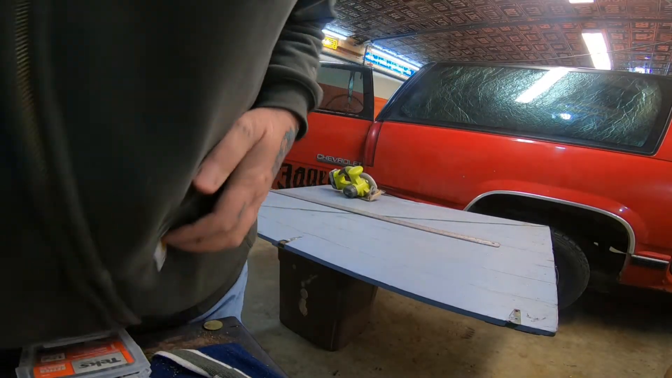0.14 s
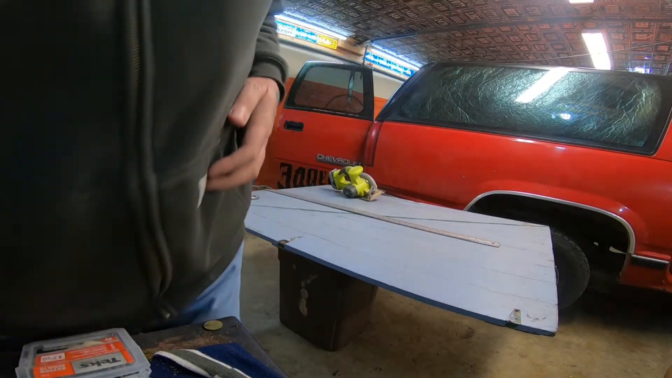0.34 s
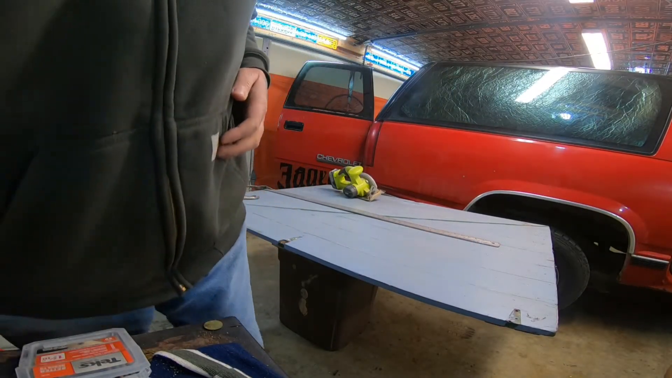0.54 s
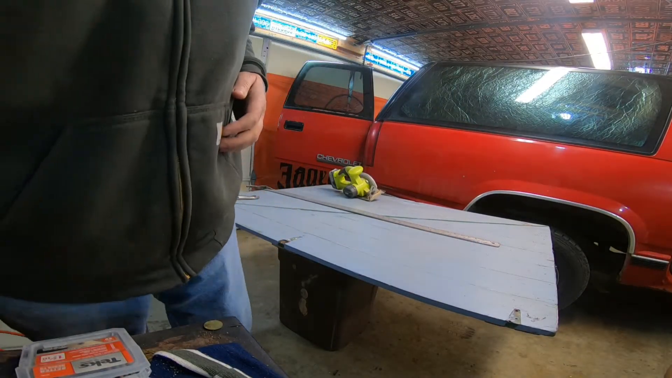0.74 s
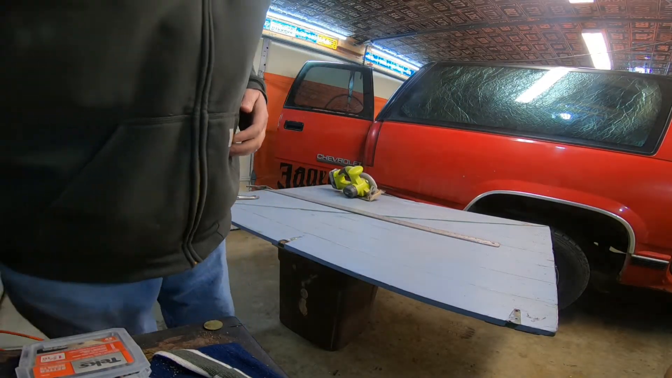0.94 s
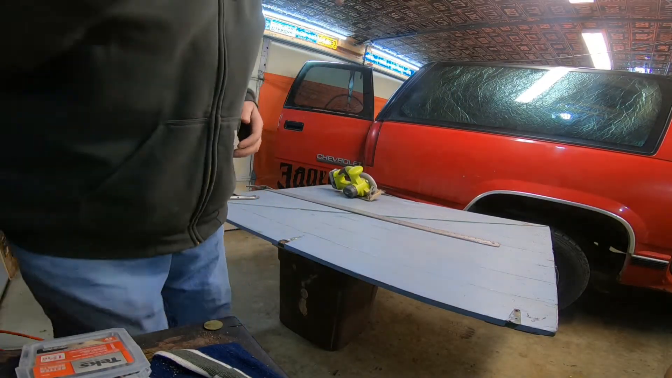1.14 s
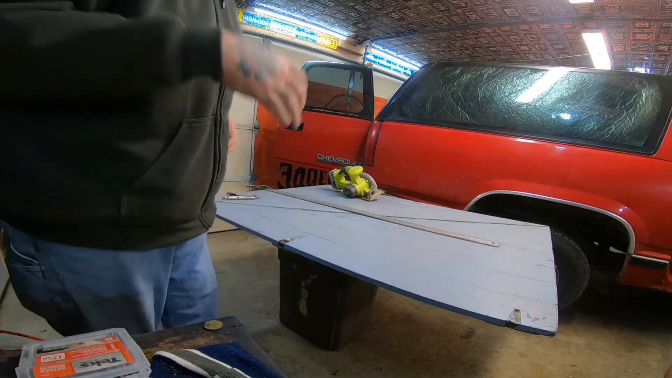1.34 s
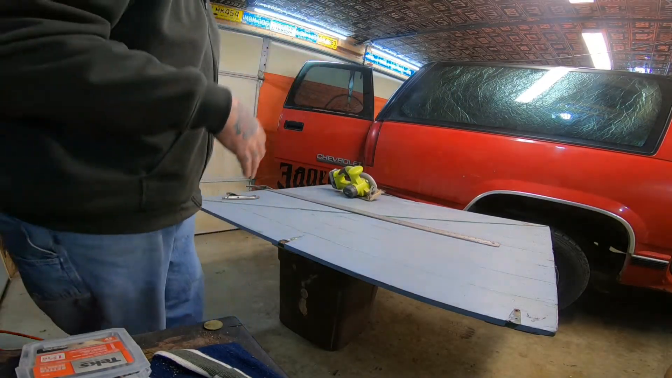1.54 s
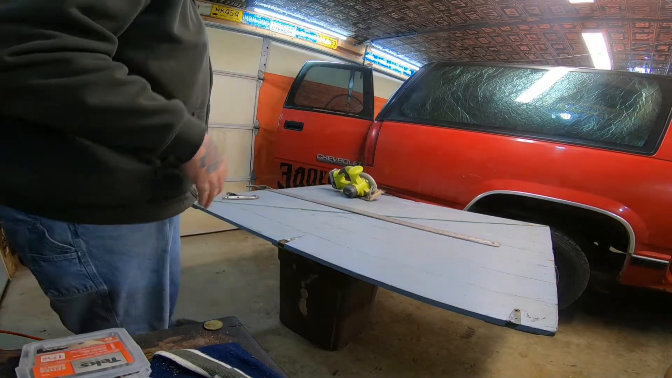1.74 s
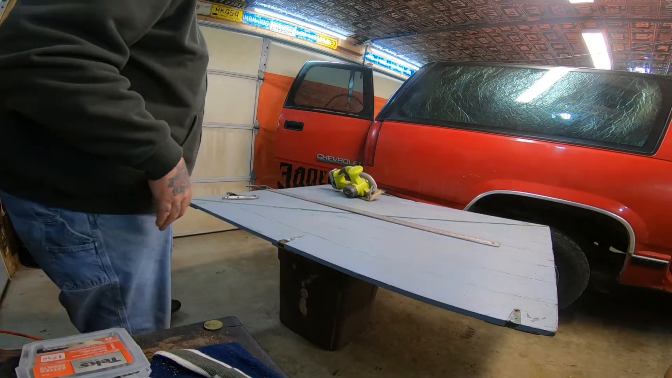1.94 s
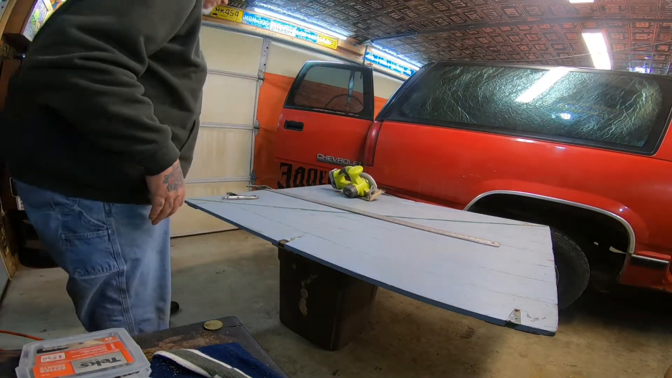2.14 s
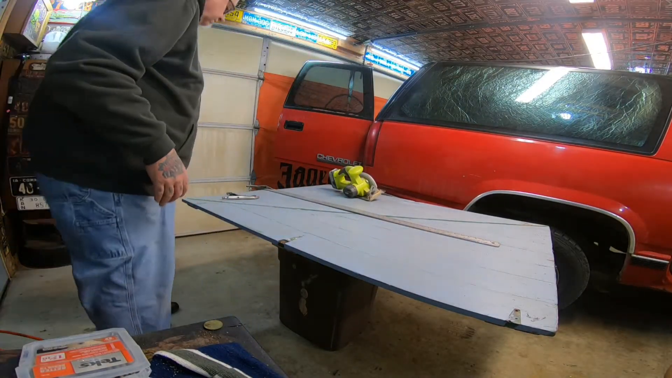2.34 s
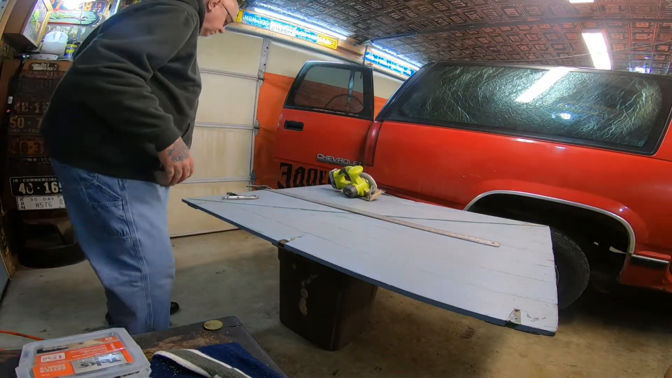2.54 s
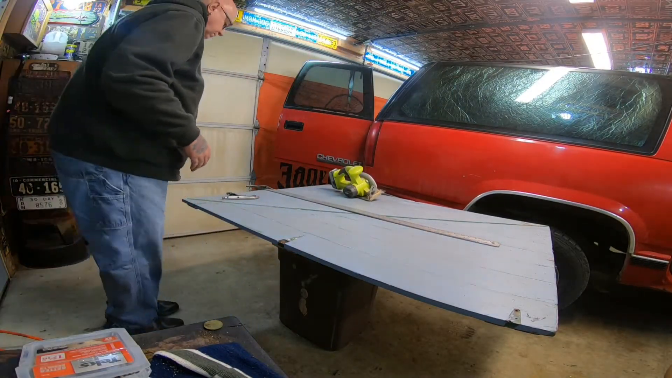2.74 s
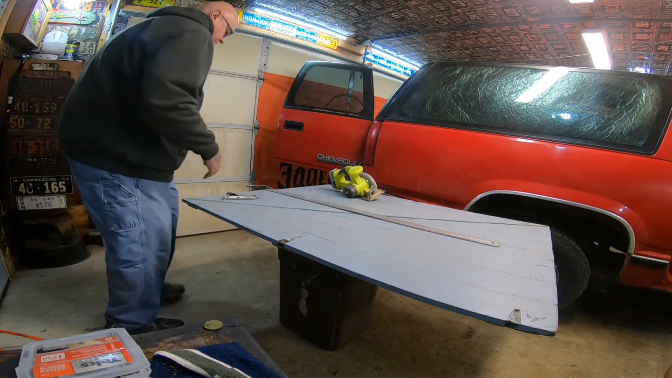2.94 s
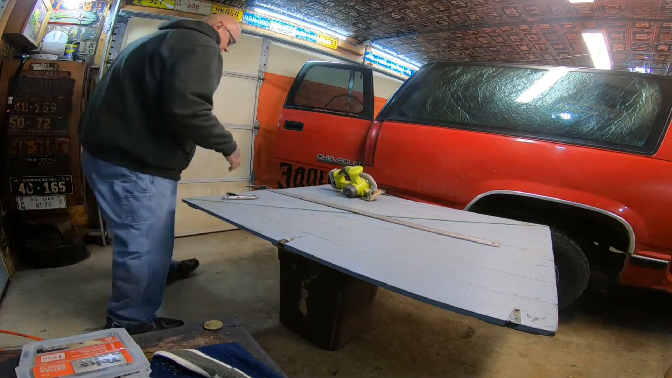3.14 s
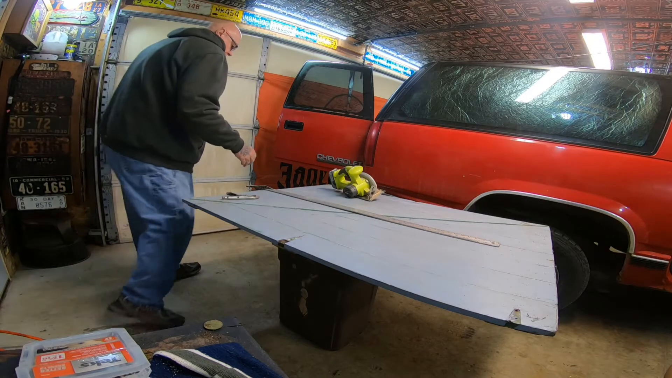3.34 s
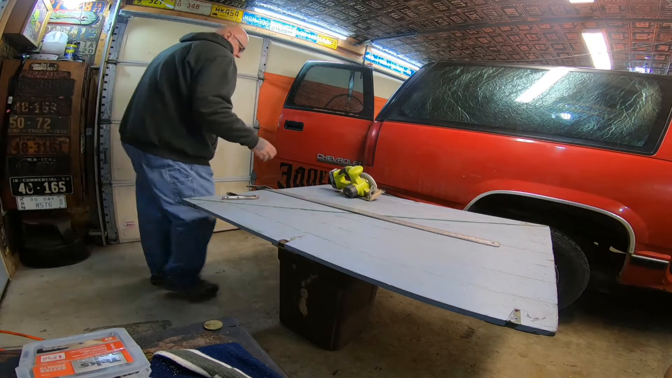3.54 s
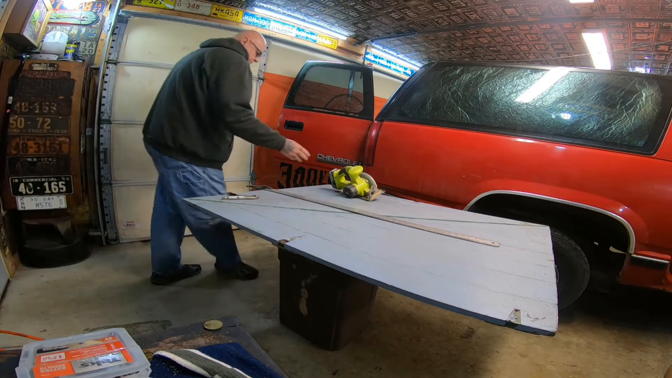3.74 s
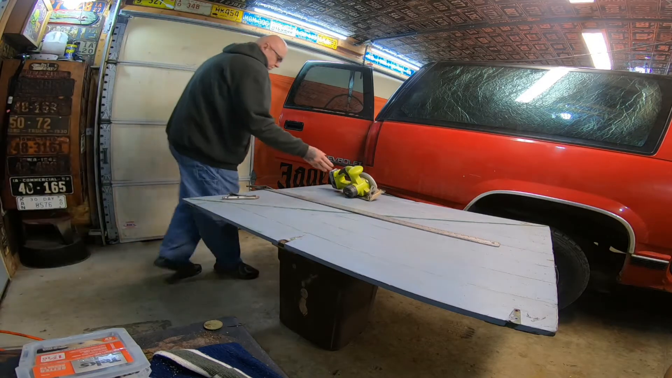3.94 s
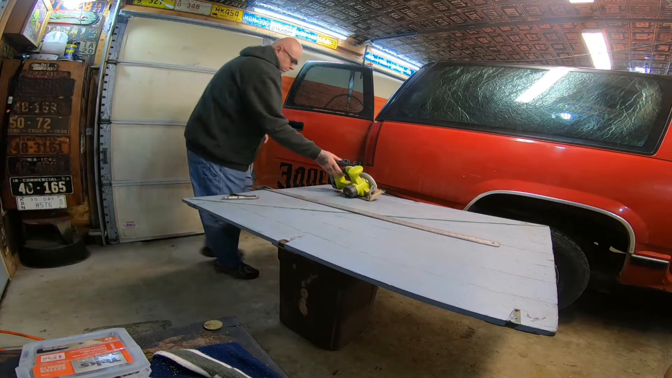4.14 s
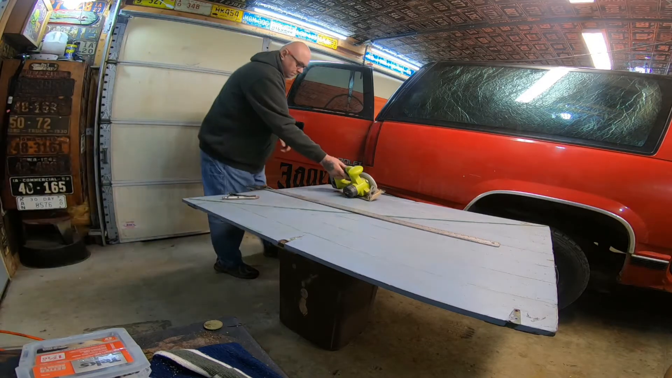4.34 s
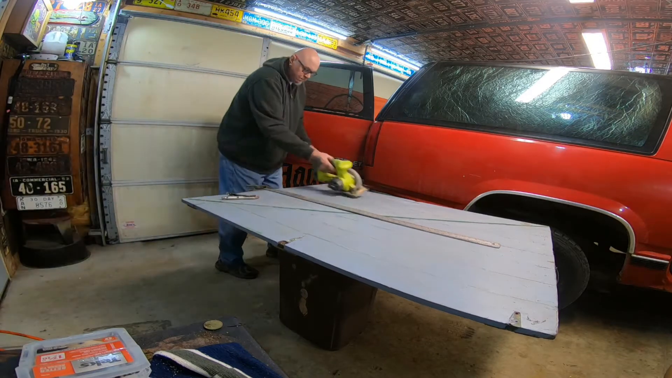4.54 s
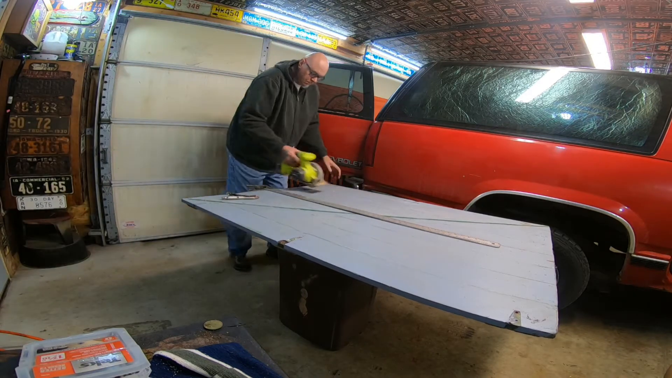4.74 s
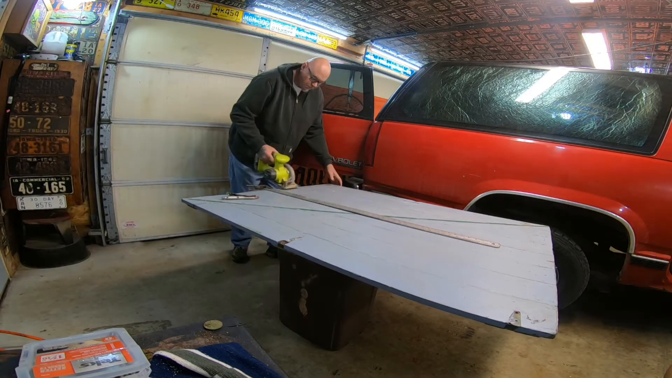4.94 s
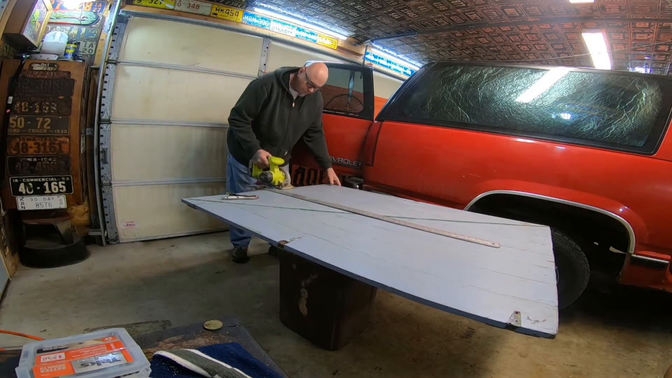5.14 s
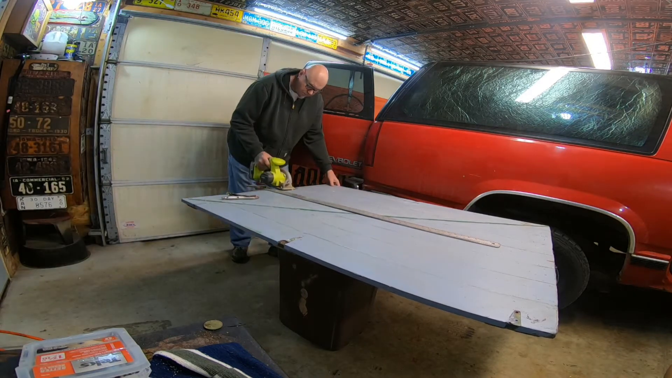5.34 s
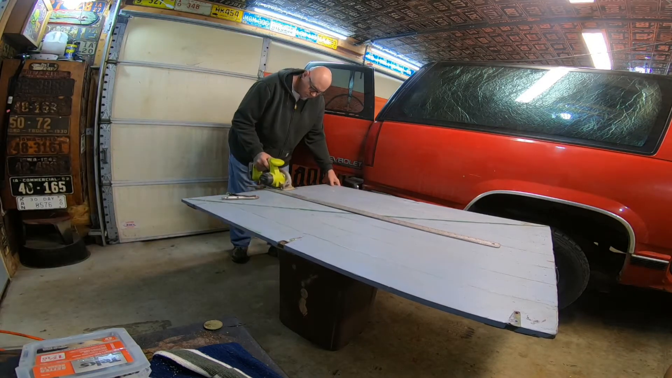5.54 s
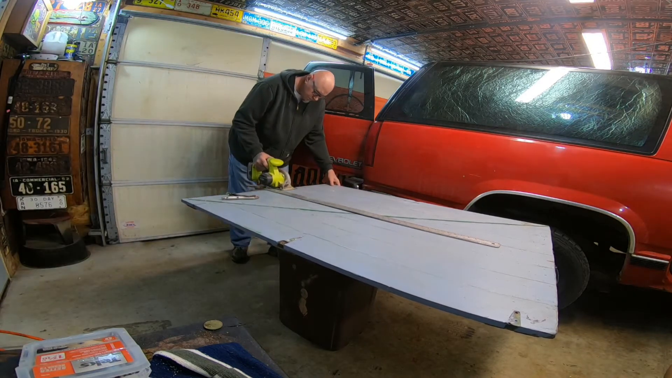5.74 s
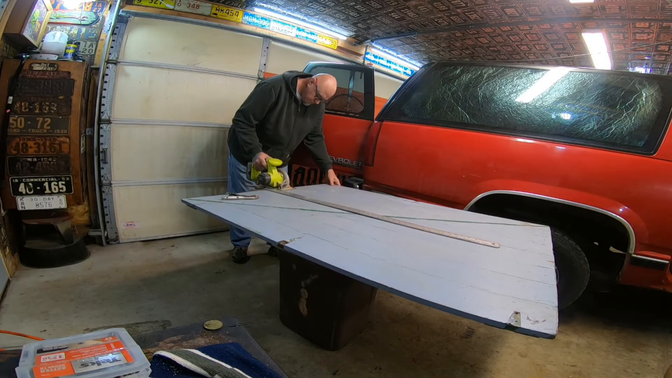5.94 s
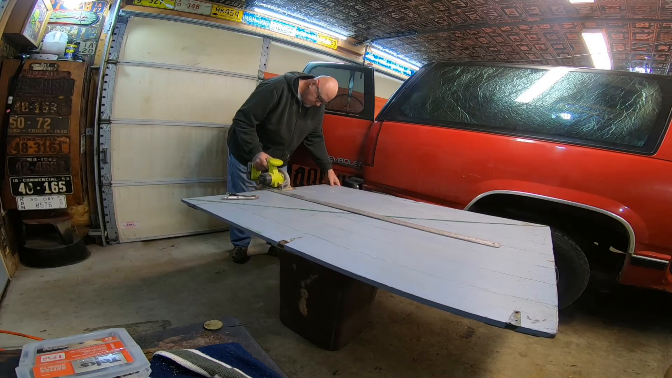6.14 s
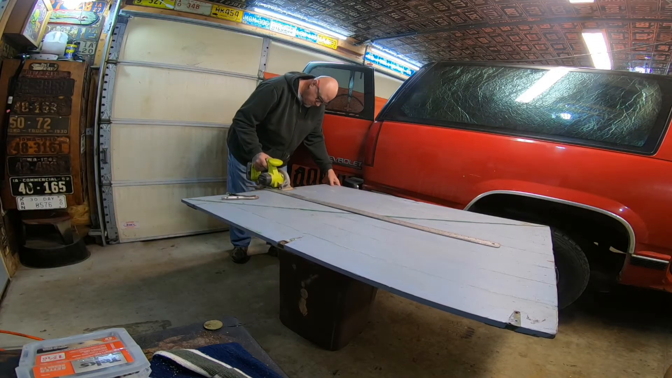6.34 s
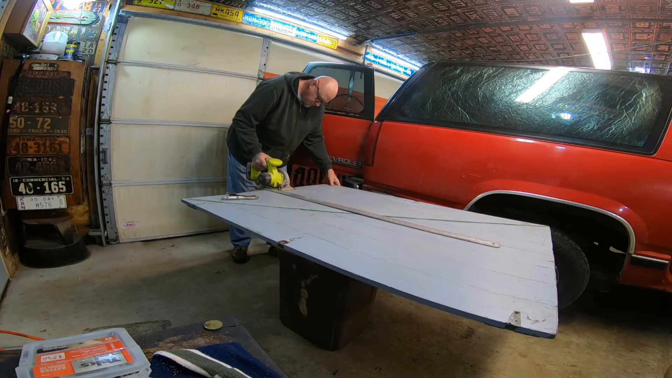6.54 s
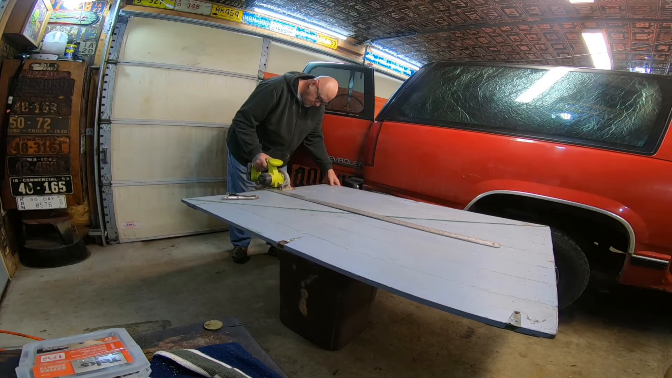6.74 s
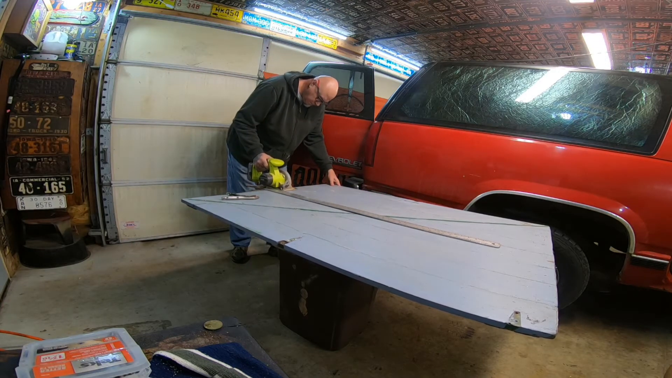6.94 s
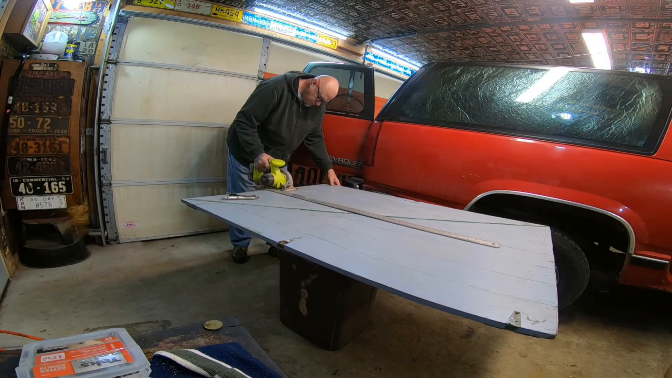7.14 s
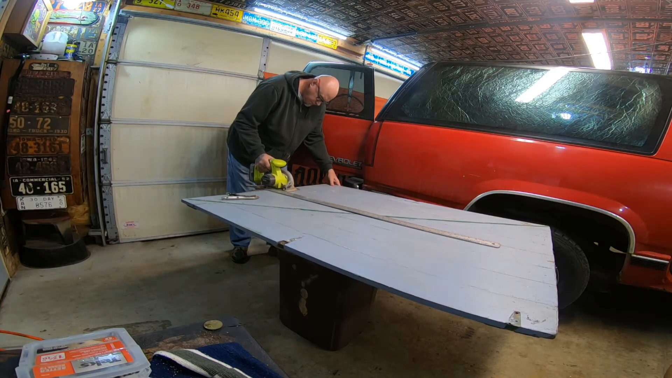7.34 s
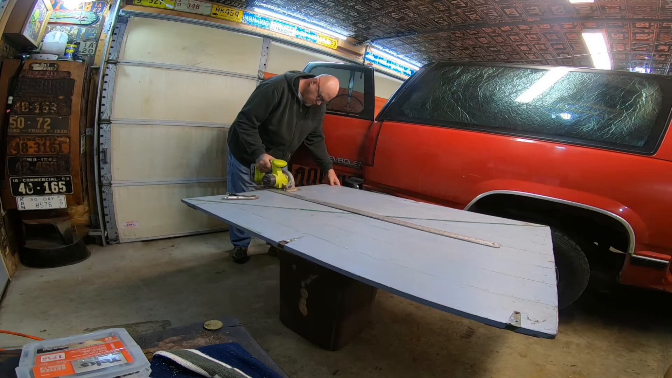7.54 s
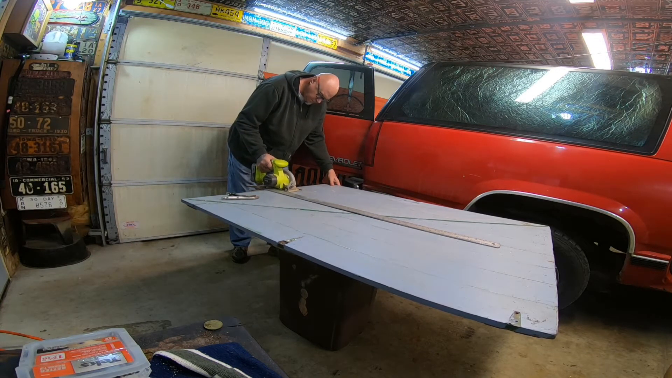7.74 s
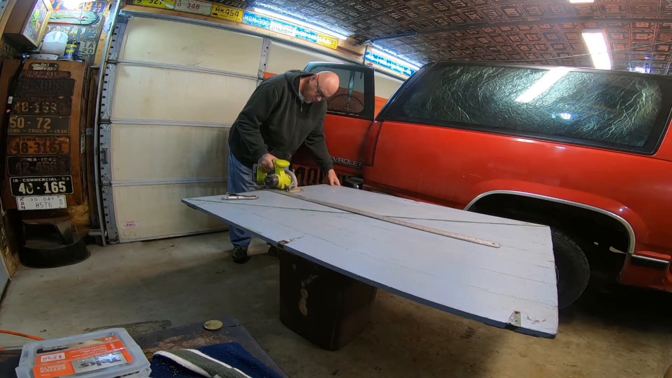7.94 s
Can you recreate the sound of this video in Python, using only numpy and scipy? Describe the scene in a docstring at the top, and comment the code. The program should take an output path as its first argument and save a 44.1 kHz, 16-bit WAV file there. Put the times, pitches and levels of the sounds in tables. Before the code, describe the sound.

Jacket rustle and scuffing shoes recede from the microphone, a power saw knocks onto a board, then it whirs up and cuts loudly.

```python
"""A circular saw cuts a large board in a garage: its teeth chop the wood and ring the blade,
which slows as it bites deeper, over the rush of the motor. Before the cut, a man walks off from the
microphone, jacket rustling close by and shoes scuffing on concrete, then drags the saw over the board
and knocks it into place. Shaped noise makes the rubs, tearing and rush; damped modes make the board;
sines make the hum and whine. Two microphone ports hear it over soft hum, room noise and hiss."""
import sys
import numpy as np
from scipy import signal
from scipy.fft import rfft, irfft, next_fast_len
from scipy.io import wavfile
from scipy.ndimage import map_coordinates

SR = 44100
rng = np.random.default_rng(int(sys.argv[2]) if len(sys.argv) > 2 else 0)


def digitize_waveform(pressure):
    """Quantize a signal to 16-bit integers and store it at the path in sys.argv[1].

    Rows of a 2-D input are taken as channels; values are limited to [-1, 1].
    """
    field = np.atleast_2d(pressure).T
    bounded = np.clip(field, -1, 1)
    quanta = np.round(bounded * 32767).astype(np.int16)
    wavfile.write(sys.argv[1], SR, quanta)


N = 356769  # length in samples


def amp(db):
    """Decibels to gain."""
    return 10 ** (np.asarray(db) / 20)


def unit(x):
    """Scale to rms 1."""
    return x / np.sqrt(np.mean(x ** 2) + 1e-20)


def along(points, hz):
    """Read (f/Hz, value) points on a log frequency axis."""
    f, v = np.transpose(points)
    return np.interp(np.log(hz + 1), np.log(f + 1), v)


def curves(rows):
    """One value per sample for each column after the time."""
    s, *cols = np.transpose(rows)
    return [np.interp(np.arange(N) / SR, s, c) for c in cols]


def wobble(rate):
    """A smooth random curve, rate knots a second."""
    knots = rng.standard_normal(int(N * rate / SR) + 4)
    return map_coordinates(knots, [np.arange(N) * rate / SR])


def filtered(x, response):
    """x times a response of frequency."""
    n = x.shape[-1]
    m = next_fast_len(n + 8192)
    return irfft(rfft(x, m) * response(np.fft.rfftfreq(m, 1 / SR)), m)[..., :n]


def colour(x, spectrum):
    """Give x a spectrum, at rms 1."""
    return unit(filtered(x, lambda hz: amp(along(spectrum, hz))))


def resonate(x, modes):
    """Ring x through (f/Hz, width/Hz, level/dB) resonances, at rms 1."""
    def response(f):
        return sum(amp(db) * 1j * f * w / (c * c - f * f + 1j * f * w) for c, w, db in modes)
    return unit(filtered(x, response))


# likeness of left and right at the microphone: (f/Hz, coherence)
COHERENCE = [(120, 0.94), (190, 0.85), (260, 0.82), (400, 0.91), (650, 0.53), (1500, 0.38), (3500, 0.88),
             (5000, 0.64), (7000, 0.086), (14000, 0.017)]


def diffuse(size):
    """White stereo noise, alike in the bass and unrelated in the top treble."""
    def mid_side(hz):
        turn = np.arccos(np.clip(along(COHERENCE, hz), -1, 1)) / 2
        return np.array([np.cos(turn), np.sin(turn)])
    mid, side = filtered(rng.standard_normal((2, size)), mid_side)
    return np.array([mid + side, mid - side])


def pan(db):
    """Left and right gains for a level difference, left minus right."""
    return amp(np.array([np.atleast_1d(db), -np.atleast_1d(db)]) / 2)


def add(track, s, sound):
    """Mix a sound into the track at a time."""
    part = track[:, round(s * SR):][:, :sound.shape[-1]]
    part += sound[:, :part.shape[-1]]


# decay of the garage: (f/Hz, t60/s)
GARAGE_DECAY = [(100, 0.21), (300, 0.85), (800, 0.45), (2000, 0.28), (5000, 0.43), (12000, 0.35)]


def garage(x, wet_db):
    """The direct sound plus a dense tail from walls and car, at constant power."""
    hz, t, z = signal.stft(diffuse(size=SR * 3 // 4), SR, nperseg=256)
    decay = amp(-60 * t / along(GARAGE_DECAY, hz)[:, None])
    tail = signal.istft(z * decay, SR, nperseg=256)[1]
    tail *= amp(wet_db) / np.linalg.norm(tail[0])
    tail[:, 0] += 1  # the direct sound
    wet = signal.fftconvolve(np.atleast_2d(x), tail, axes=1)[:, :x.shape[-1]]
    return wet / np.hypot(1, amp(wet_db))


def stroke(start, length, db, attack, release):
    """The gain of one rubbing move: it rises, holds, then falls 60 dB over the release."""
    t = np.arange(N) / SR - start
    fall_db = 60 * np.clip((t - length) / release, 0, 2)
    return np.clip(t / attack, 0, 1) * amp(db - fall_db)


def together(gains):
    """Overlapping strokes add in power."""
    return np.sqrt(sum(gain ** 2 for gain in gains))


# slow fading of the hum: (t/s, mean level/dB)
HUM_LEVEL = [(0, -56), (.8, -54.5), (1.3, -60), (4.3, -59.5), (5.8, -68.5)]
# spectrum of the room noise: (f/Hz, level/dB per Hz)
ROOM_SPECTRUM = [(15, -26.5), (60, -2.5), (110, -15), (165, -1.5), (300, -4), (380, -12), (480, -23),
                 (680, -11.5), (900, -20), (1500, -22.5), (2200, -31), (5000, -32), (15000, -64)]
# spectrum of the microphone hiss: (f/Hz, level/dB per Hz)
HISS_SPECTRUM = [(2000, -30.5), (4500, -16), (5600, -5.5), (6150, 1), (6700, -14), (7300, -14.5),
                 (8700, -0.5), (10300, -7.5), (11200, -15.5), (11900, -4.5), (13200, -14), (14200, -17),
                 (15000, -36)]


def background():
    """Something hums softly, a sine of unsteady phase, over dim room noise and microphone hiss."""
    hum_hz = 200
    phase = 2 * np.pi * hum_hz * np.arange(N) / SR + 0.46 * wobble(25)
    hum = amp(curves(HUM_LEVEL)[0] + 2.5 * wobble(9)) * unit(np.sin(phase))
    room = amp(-59.0) * colour(diffuse(size=N), ROOM_SPECTRUM)
    hiss = amp(-64.5) * colour(diffuse(size=N), HISS_SPECTRUM) * pan(-11.0)
    return hum + room + hiss


# the jacket rubs with each move of arm or leg: (start t/s, length t/s, mean level/dB)
JACKET_MOVES = [(-.05, 0.26, -48.5), (.22, .29, -51.5), (.5, 0.16, -59), (.82, 0.15, -58),
                (.92, 0.54, -56.5), (1.47, 0.11, -58.5), (2.3, 0.17, -60.5), (2.78, 0.16, -59),
                (3.16, 0.24, -59), (3.87, 0.18, -59), (4.2, 0.22, -61)]
# a hand slides in the pocket: (start t/s, length t/s, level/dB)
POCKET_MOVES = [(.95, 0.21, -59.5)]
# spectrum of the rubbing cloth: (f/Hz, level/dB per Hz)
CLOTH_SPECTRUM = [(180, -26), (300, 1.5), (520, -8.5), (900, -9), (1360, -5), (1900, -1.5), (2500, -6),
                  (4300, -5), (5000, -9.5), (6000, -14.5), (7000, -19), (10800, -48), (15000, -62)]
# the zip and pocket tick close by: (t/s, starting level/dB, brightness f/Hz, t60/s)
ZIP_TICKS = [(0.011, -40, 1100, 0.076), (0.415, -42, 1280, 0.12), (0.499, -33.5, 2760, 0.027),
             (0.68, -46.5, 1960, 0.06), (0.953, -49.5, 1200, 0.26)]
CLOTH_ATTACK_S, CLOTH_RELEASE_S = 0.038, 0.38  # rise of a rub, and its time to fall 60 dB
# dull flapping fades as he walks off: mean level at START_M, that distance to the microphone, pace
FOLDS_DB, START_M, PACE_M_PER_S = -51.5, 0.28, 0.57


def jacket():
    """Cloth rubs in small clumps near the microphone, a hand slides in the pocket and the zip ticks."""
    def moves(rows):
        return together(stroke(s, length, db, CLOTH_ATTACK_S, CLOTH_RELEASE_S) for s, length, db in rows)
    cloth = colour(diffuse(size=N) * amp(1.05 * wobble(700)), CLOTH_SPECTRUM)
    rustle = moves(JACKET_MOVES) * amp(1.23 * wobble(40)) * cloth
    pocket = moves(POCKET_MOVES) * resonate(diffuse(size=N), [(1950, 72, 0)])
    nearness = START_M / (START_M + PACE_M_PER_S * np.arange(N) / SR)
    flapping = colour(diffuse(size=N), [(15, -6), (35, 7), (70, -3), (110, -12.5), (170, 2.5),
                                        (380, -4.5), (700, -18.0), (2000, -58)])
    folds = nearness * amp(FOLDS_DB + 5.7 * wobble(12.3)) * flapping
    track = rustle + pocket + folds
    t = np.arange(SR // 8) / SR
    for s, db, bright_hz, t60 in ZIP_TICKS:
        spectrum = [(200, -12), (700, -2), (bright_hz, 0), (2 * bright_hz, -15), (14000, -40)]
        tick = colour(diffuse(size=len(t)), spectrum)
        add(track, s, amp(db) * tick * amp(-60 * t / t60))
    return track


# shoes on concrete, and near 1.28 s a hand pulled out of the pocket:
# (t/s, scuff level/dB before SCUFF_GAIN_DB, rise t/s, scuff t60/s, dull blow level/dB)
SCUFFS = [(1.099, -47, .026, 0.16, -53), (1.275, -45, 0.0085, 0.22, -43), (1.29, -41.5, .023, 0.14, -39),
          (2.159, -65, 0.017, 1, -51), (2.46, -46.5, 0.028, .29, -66), (2.747, -48, 0.0068, 0.33, -41.5),
          (2.86, -58, 0.029, 0.92, -46.5), (3.026, -49.5, 0.0018, 0.074, -70), (3.17, -56.5, 0.02, 1, -63),
          (3.411, -52, 0.016, 0.3, -64), (3.754, -37, 0.017, 0.31, -42.5), (4.029, -47.5, .014, 0.29, -63)]
# spectrum of the scuffs: (f/Hz, level/dB per Hz)
SCUFF_SPECTRUM = [(150, -49), (250, -15), (297, -6.5), (531, -9.5), (699, -1.5), (968, -8.5), (1050, -4.5),
                  (1560, -9), (4930, -7), (6940, -9.5), (9130, -11), (15000, -36.5)]
# the dull blow, as of a heel: (f/Hz, level/dB per Hz)
BLOW_SPECTRUM = [(60, -14), (130, -6), (300, -10), (580, 1), (900, -7), (1600, -16), (3000, -24),
                 (8000, -50)]
SCUFF_GAIN_DB, BLOW_T60_S = 2.5, 0.13


def steps():
    """A heel lands and the sole scuffs over grit; a hand leaving the pocket is made the same way."""
    track, t = np.zeros((2, N)), np.arange(SR * 3 // 4) / SR
    for s, db, rise, t60, blow_db in SCUFFS:
        grains = rng.standard_normal(len(t)) * amp(3.5 * rng.standard_normal(len(t)))
        swell = np.minimum(t / rise, amp(-60 * (t - rise) / t60))
        scuff = amp(db + SCUFF_GAIN_DB) * colour(grains, SCUFF_SPECTRUM) * swell
        dull = colour(rng.standard_normal(len(t)), BLOW_SPECTRUM)
        blow = amp(blow_db - 60 * t / BLOW_T60_S) * dull
        add(track, s, garage(scuff + blow, wet_db=1))
    return track * pan(-2.5)


# shoves of the saw over the board: (start t/s, length t/s, mean level/dB, rise t/s)
SHOVES = [(4.404, 0.019, -46, 0.0094), (4.592, 0.21, -44, 0.056), (4.771, .15, -37, 0.064),
          (4.98, 0.24, -62, .03), (5.147, 0.096, -45.5, 0.025), (5.266, 0.11, -49.5, .03),
          (5.364, 0.049, -41.5, 0.046), (5.615, 0.21, -60.5, 0.044), (5.908, .04, -45.5, 0.054),
          (6.031, 0.27, -59.5, .03), (6.473, .045, -55.5, .015)]
# spectrum of the sliding shoe: (f/Hz, level/dB per Hz)
SLIDE_SPECTRUM = [(120, -46), (200, -19.5), (318, -15), (366, -16.5), (939, -5.5), (1460, -5.5), (1910, -3),
                  (2200, -6), (3090, -7.5), (9140, -17), (14000, -45)]
# spectrum of the rasp of a hard shove: (f/Hz, level/dB per Hz)
RASP_SPECTRUM = [(1200, -30), (2000, 3), (3200, 2), (5500, 1), (7000, -15), (10000, -24), (14000, -45)]
RASP_DB, RASP_POWER = -34.5, 2.2  # mean level in the hardest shove, and how steeply it grows with force
DRAG_RELEASE_S = .25  # time to fall 60 dB after a shove


def drag():
    """The saw's shoe slides over the grain of the board, shove by shove, and rasps when pushed hard."""
    slide = colour(diffuse(size=N) * amp(0.5 * wobble(500)), SLIDE_SPECTRUM)
    force = together(stroke(s, length, db, rise, DRAG_RELEASE_S) for s, length, db, rise in SHOVES)
    rasp_gain = amp(RASP_DB) * (force / force.max()) ** RASP_POWER
    rasp = rasp_gain * colour(diffuse(size=N), RASP_SPECTRUM)
    return (slide * force + rasp) * amp(wobble(38)) * pan(-1.2)


def ring(modes, t, attack):
    """Damped modes at fresh strengths and phases, near rms 1 before the soft attack and decay."""
    hz, db, t60 = np.transpose(modes)[:, :, None]
    gain = amp(db + 2 * rng.standard_normal(hz.shape))
    sines = np.sin(2 * np.pi * (hz * t + rng.random(hz.shape)))
    waves = gain * amp(-60 * t / t60) * sines
    return waves.sum(0) * (1 - np.exp(-t / attack)) / np.sqrt(np.sum(gain ** 2) / 2)


# contacts of the saw's shoe, the click of its trigger and its starting jolt:
# (t/s, clack level/dB, board thud level/dB, boom level/dB)
CONTACTS = [(4.431, -20.5, -25.5, -40), (4.464, -29.5, -25.5, -37), (4.5, -25.5, -35, -37.5),
            (4.927, -15.5, -29.5, -47), (4.968, -32, -31, -42), (5.046, -25.5, -30.5, -30),
            (5.099, -30.5, -31.5, -31), (5.23, -38.5, -38.5, -39), (5.366, -25, -35, -45),
            (5.386, -21.5, -28.5, -30), (5.411, -24.5, -26.5, -32), (5.449, -23, -25, -32.5),
            (5.964, -10, -34.5, -51), (5.997, -19.5, -30, -42), (6.149, -35.5, -41, -53),
            (6.515, -32.5, -52, -66), (6.549, -16, -35.5, -64)]
# spectrum of the clack: (f/Hz, level/dB per Hz)
CLACK_SPECTRUM = [(100, -26.5), (350, -11), (600, -10.5), (790, -8), (920, -0.5), (1140, -6), (1270, -2),
                  (1500, -5), (1850, 2), (2300, -11.5), (5800, -17.5), (7000, -24.5), (9700, -26),
                  (12500, -57), (15000, -70)]
# modes of the board, the thud: (f/Hz, typical level/dB, t60/s)
BOARD_MODES = [(131.8, 3, 0.22), (147.6, -2, 0.42), (178.3, 1, 0.44), (210, -11.5, 0.56),
               (270.3, -7.5, 0.54), (331.5, -4.5, 0.39), (402.2, -5, 0.3), (455, -8, 0.44), (518, -2, 0.19),
               (587, -5, 0.17)]
# slow flapping of the whole sheet, the boom: (f/Hz, typical level/dB, t60/s)
SAG_MODES = [(54, -3.5, 0.16), (63.3, 0, 0.29), (79.7, 0.5, 0.34)]


def knocks():
    """Each contact is a short clack of the saw's shoe and a slower thud and boom of the board."""
    track, t = np.zeros((2, N)), np.arange(SR * 3 // 4) / SR
    for s, clack_db, thud_db, boom_db in CONTACTS:
        decay = amp(-60 * t / 0.019) + 0.4 * amp(-60 * t / 0.13)
        clack = colour(rng.standard_normal(len(t)), CLACK_SPECTRUM) * decay
        clack = amp(clack_db) * garage(clack, wet_db=8)
        thud = amp(thud_db) * ring(BOARD_MODES, t, attack=0.0092)
        boom = amp(boom_db) * ring(SAG_MODES, t, attack=.01)
        add(track, s, (clack + thud + boom) * pan(0.34))
    return track


def chopping(teeth, sharpness, runout, count):
    """Noise that swells with each tooth, more so once a turn of the blade."""
    bite = np.exp(sharpness * np.cos(2 * np.pi * teeth))
    turn = 1 + runout * np.cos(2 * np.pi * teeth / count)
    return unit(bite * turn * diffuse(size=N))


def ripple(x, depth_db, spacing_hz):
    """Countless close modes leave fine peaks and dips in a spectrum."""
    hz = np.arange(0, SR, spacing_hz)
    peaks = rng.standard_normal(len(hz))
    return unit(filtered(x, lambda f: amp(depth_db * np.interp(f, hz, peaks))))


# the blade's ring and whine swell or dip, at the start as the rising whine meets its resonances,
# later in the cut: (peak t/s, half length t/s, change of ring level/dB, change of whine level/dB)
RING_SWELLS = [(6.586, 0.015, 13.5, 5), (6.595, 0.0098, -9, 15.5), (6.633, 0.023, 8.5, 15.5),
               (6.79, .025, 9.5, 4), (7.03, 0.1, -4, 8), (7.207, 0.058, 5.5, 0), (7.399, .04, 8, 12),
               (7.474, 0.022, -1, 5), (7.688, 0.1, 5.5, 11), (7.852, 0.05, 2.5, 8), (8.06, 0.068, -4, 11)]


def ring_swells():
    """Extra dB of the blade's ring and whine: smooth swells and dips at the start and in the cut."""
    s, half, ring_db, whine_db = np.transpose(RING_SWELLS)
    swells = np.exp(-((np.arange(N) / SR - s[:, None]) / half[:, None]) ** 2)
    return ring_db @ swells, whine_db @ swells


# the hand's push sets the speed in the cut: (t/s, teeth striking f/Hz before spin-up and judder)
CUT_SPEED = [(6.7, 1110), (6.8, 1052), (7.0, 1002), (7.15, 925), (7.22, 895), (7.31, 914), (7.4, 867),
             (7.5, 828), (7.62, 862), (7.72, 838), (7.87, 795), (8.09, 809)]
# the blade's main ring: (f/Hz, width/Hz, level/dB)
BLADE_MODES = [(1654, 61, 0), (1755, 13, 9.5), (1840, 50, -15.5)]
# the blade's higher modes: (f/Hz, width/Hz, level/dB)
BLADE_OVERTONES = [(2089, 14, 0), (2462, 12, -3), (2611, 18, -3), (2767, 8, 1), (2923, 10, 0),
                   (3047, 12, -1), (3433, 12, 2), (3827, 16, 1), (3984, 16, -2), (4443, 14, 1),
                   (4520, 18, 0), (4910, 16, 0), (5131, 16, 3), (5361, 12, 0), (5861, 22, 1),
                   (6185, 12, -4), (7930, 14, -2)]
# spectra of the torn wood, the motor's rush and the shaken board: (f/Hz, level/dB per Hz)
TEARING_SPECTRUM = [(300, -32.5), (600, -12.5), (900, -6.5), (1200, -2), (1450, 0), (1900, 2.5),
                    (2500, -7.5), (3300, -3.5), (4500, 3.5), (5700, 0.5), (7000, -5), (10000, -1.5),
                    (15000, -39)]
MOTOR_SPECTRUM = [(500, -17.5), (1100, -4), (2500, 1.5), (4000, -8.5), (6500, -8.5), (7400, -24.5),
                  (8200, 0.5), (9100, 3), (9600, -6.5), (10300, -4.5), (11100, -13.5), (12200, -10.5),
                  (13500, -17.5), (15000, -41.5)]
SHAKING_SPECTRUM = [(41, -47), (70, -25), (124, -1.5), (174, 2.5), (210, -16), (253, -2.5), (334, -5.5),
                    (430, -11.5), (600, -12.5), (780, -61), (1320, -120)]
# each band of the saw leans to one side: (f/Hz, left minus right level/dB)
SAW_LEAN = [(300, 0.5), (700, -0.5), (1300, 2.5), (2300, 2), (4300, -3), (8000, -7), (13000, 1)]
# base levels of tearing, motor, shaken board, ring, tooth tone and its octave: (level/dB at top speed,
# level/dB more per octave that the cut slows it, level/dB more under the strain of the start)
TEARING_LAW = (-28.5, 3.5, 0)
MOTOR_LAW = (-23, -7.5, 4)
SHAKING_LAW = (-38, -3, 0)
BLADE_LAW = (-36, 12.6, 8.6)
TOOTH_TONE_LAW = (-32, -22, -14)
WHINE_LAW = (-38.5, 13.5, 5.7)
# the motor is switched on, jumps to about a share of its speed and spins up; the strain dies away
SWITCH_ON_S, JUMP_SHARE, SPIN_UP_S, STRAIN_S = 6.547, .1, .094, 0.13
RUSH_DB_PER_OCTAVE = 7.5  # motor rush, tearing and overtones grow as the blade spins up


def saw():
    """Teeth tear the wood, shake the board and ring the blade over the motor; levels follow the load."""
    age = np.maximum(np.arange(N) / SR - SWITCH_ON_S, 0)
    speed, = curves(CUT_SPEED)
    spin = np.tanh(JUMP_SHARE + age / SPIN_UP_S)
    load = np.log2(speed.max() / speed)
    strain = np.exp(-(age / STRAIN_S) ** 2)

    def level(law):
        return law[0] + law[1] * load + law[2] * strain

    rush_db = RUSH_DB_PER_OCTAVE * np.log2(spin)
    ring_db, whine_db = ring_swells()
    judder = .014 * wobble(70)
    teeth = np.cumsum(speed * spin * (1 + judder)) / SR  # running count of tooth strikes
    chops = chopping(teeth, sharpness=0.21, runout=0.17, count=18)
    grain_db = 0.84 * wobble(30)  # hard and soft fibres

    blade = amp(level(BLADE_LAW) + ring_db + grain_db) * resonate(chops, BLADE_MODES)
    # the deeper the cut, the more the higher modes sing
    overtones = amp(level(TEARING_LAW) + rush_db) * resonate(diffuse(size=N), BLADE_OVERTONES)
    tearing_db = level(TEARING_LAW) + rush_db + grain_db + 2.5
    tearing = amp(tearing_db) * colour(chops, TEARING_SPECTRUM)
    rush = ripple(colour(diffuse(size=N), MOTOR_SPECTRUM), depth_db=3.5, spacing_hz=27.8)
    motor = amp(level(MOTOR_LAW) + rush_db + 0.63 * wobble(40)) * rush
    tooth = amp(level(TOOTH_TONE_LAW) + 3.3 * wobble(55)) * np.sin(2 * np.pi * teeth)
    flutter_db = 3 * wobble(110)
    whine = amp(level(WHINE_LAW) + whine_db + flutter_db) * np.sin(4 * np.pi * teeth)

    sound = blade + overtones + tearing + motor + garage(tooth + whine, wet_db=-2)
    sound = filtered(sound, lambda hz: pan(along(SAW_LEAN, hz)))
    board = amp(level(SHAKING_LAW)) * colour(chops[0], SHAKING_SPECTRUM)
    onset = np.minimum(age / 0.0049, 1)
    return onset * (sound + board)


def scene():
    """Everything that sounds in the garage."""
    return background() + jacket() + steps() + drag() + knocks() + saw()


# the two microphone ports hear the treble at different times: (f/Hz, phase lead of the left/rad)
PORT_PHASE = [(300, 0), (1640, 0.3), (2150, -0.2), (3000, 0), (4740, 0.87), (6600, 0.5), (8400, 3.5),
              (10900, 7)]
TOP_HZ = 15200  # band limit


def record(dry):
    """Two microphone ports differ in phase in the treble; nothing passes above the band limit."""
    def ports(hz):
        return (hz < TOP_HZ) * np.exp(.5j * np.outer([1, -1], along(PORT_PHASE, hz)))
    return filtered(dry, ports)


dry = scene()
out = record(dry)
digitize_waveform(out)
```